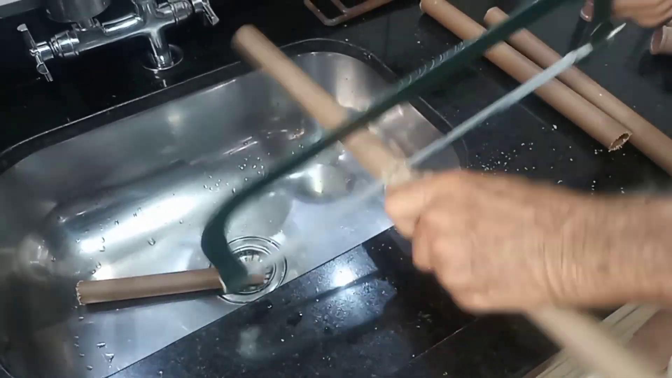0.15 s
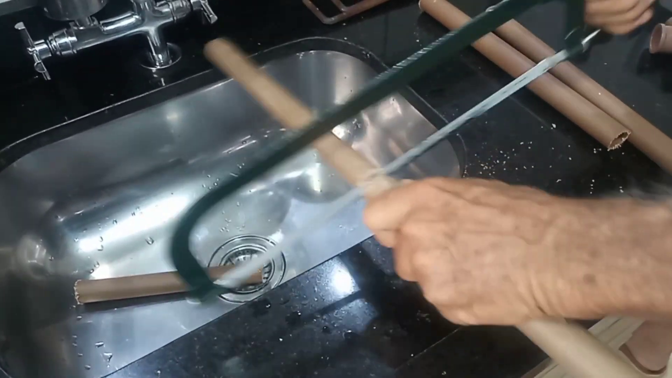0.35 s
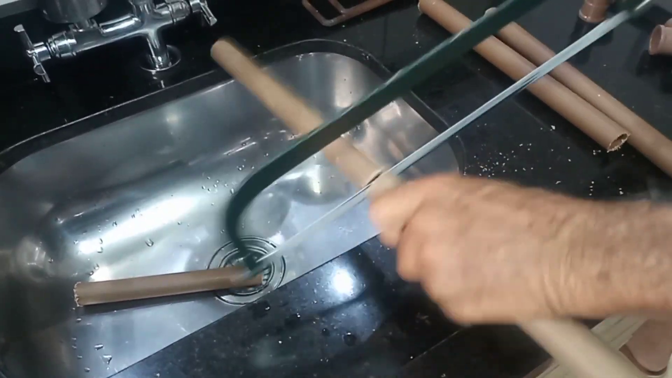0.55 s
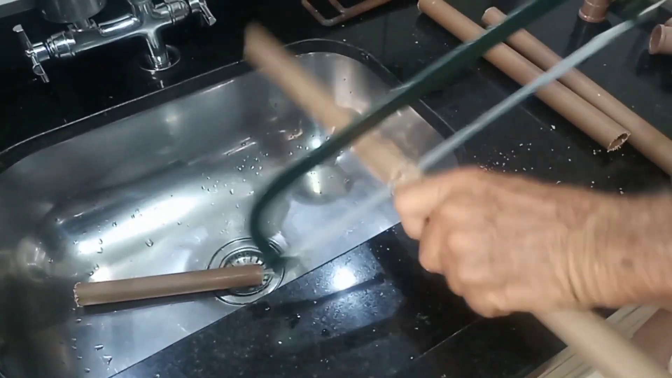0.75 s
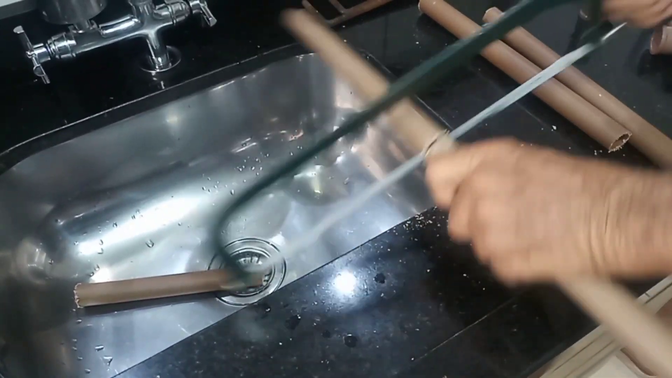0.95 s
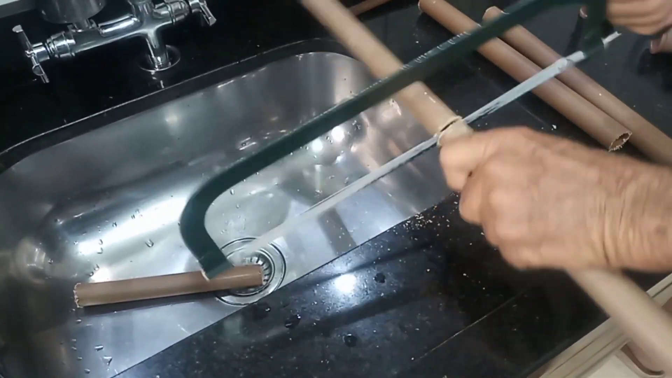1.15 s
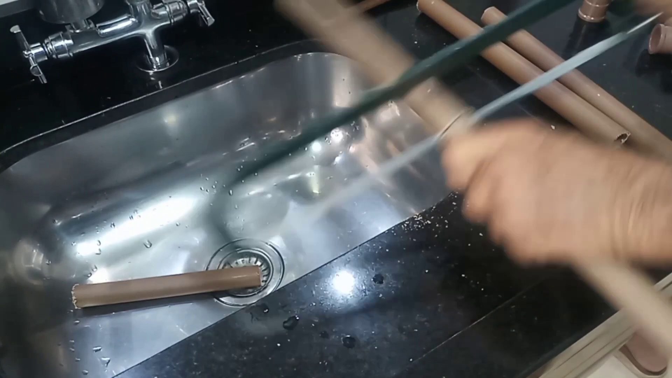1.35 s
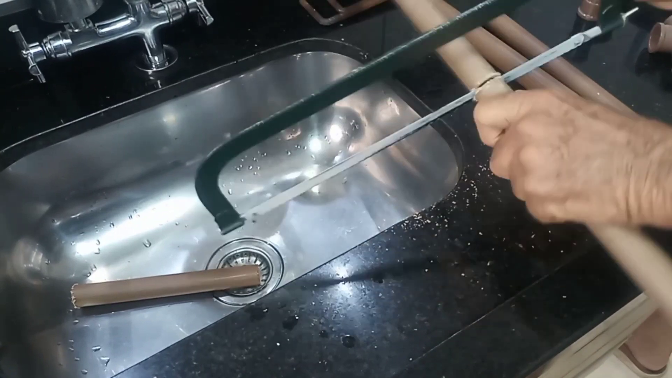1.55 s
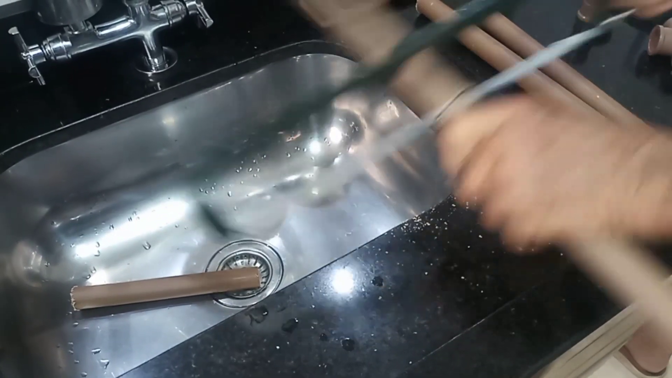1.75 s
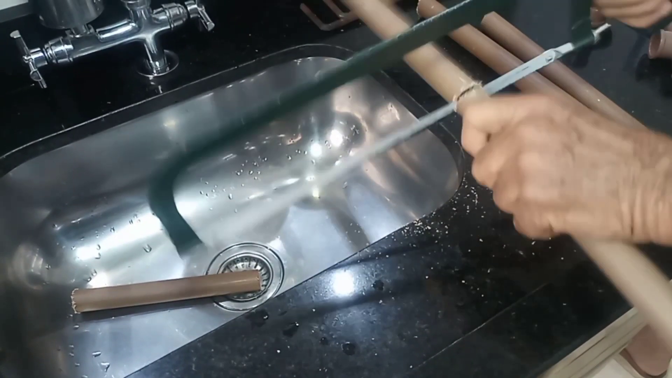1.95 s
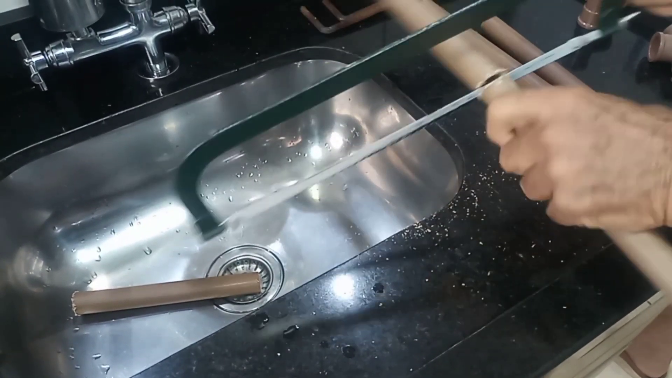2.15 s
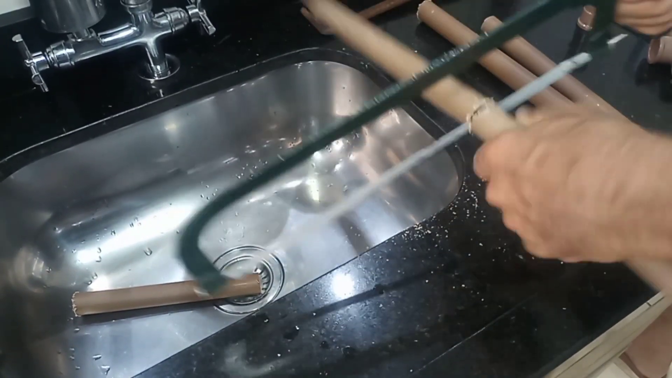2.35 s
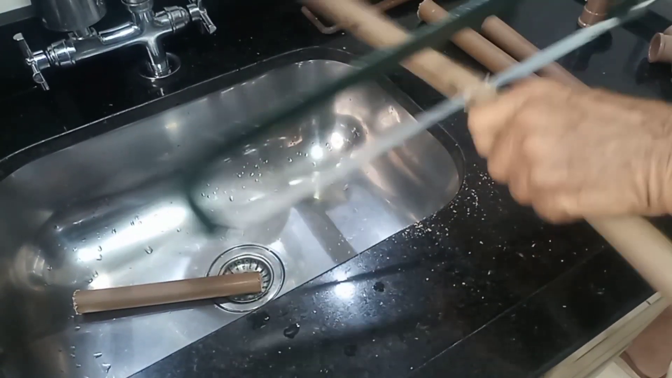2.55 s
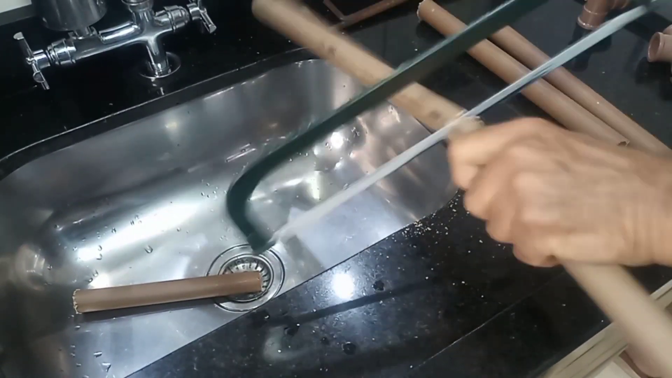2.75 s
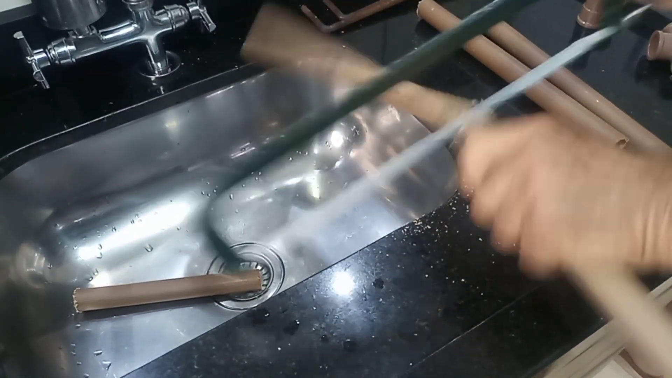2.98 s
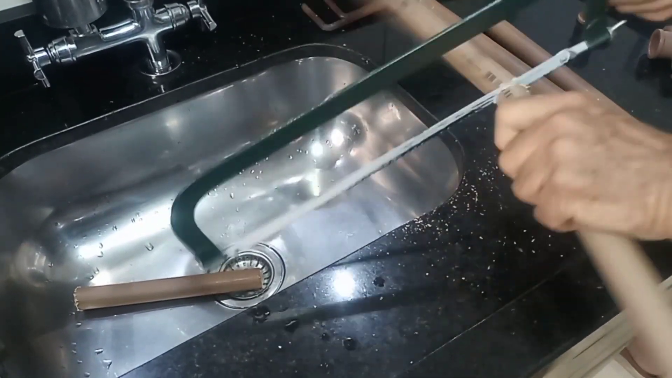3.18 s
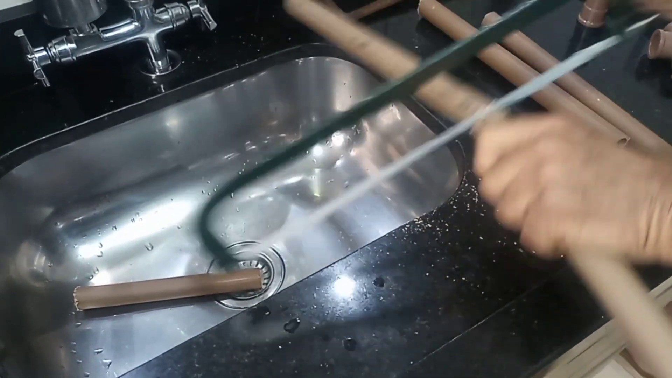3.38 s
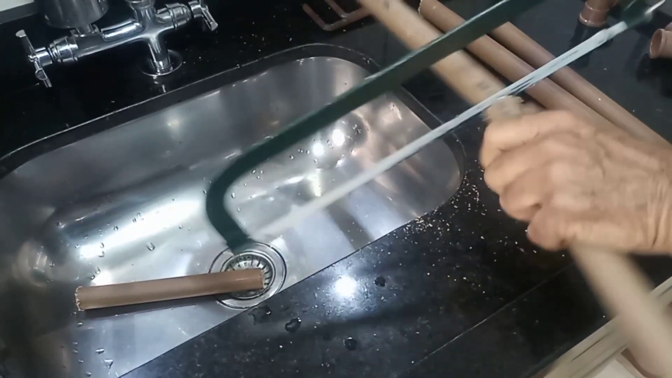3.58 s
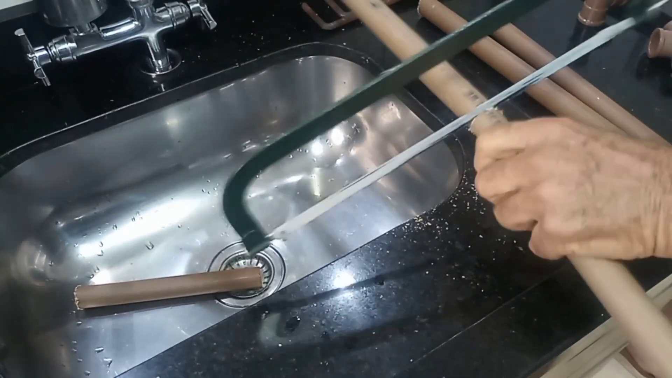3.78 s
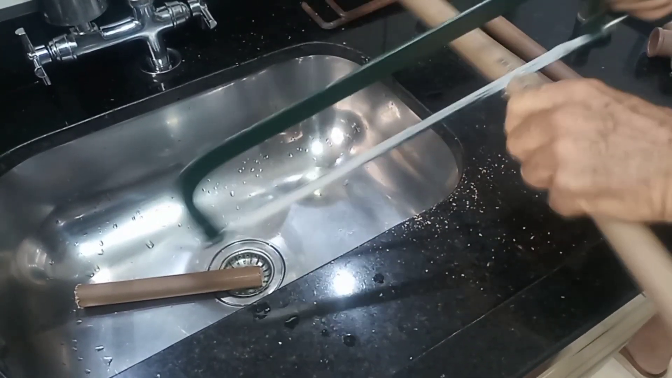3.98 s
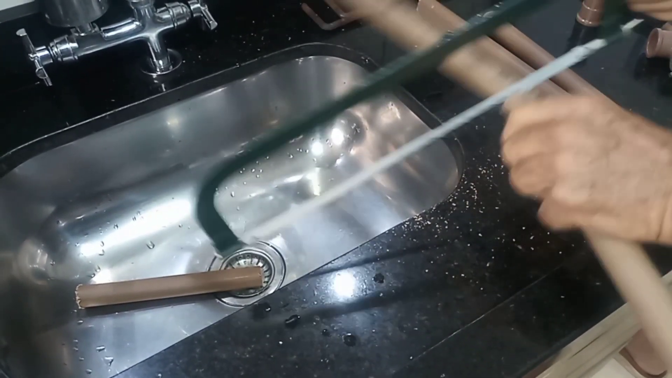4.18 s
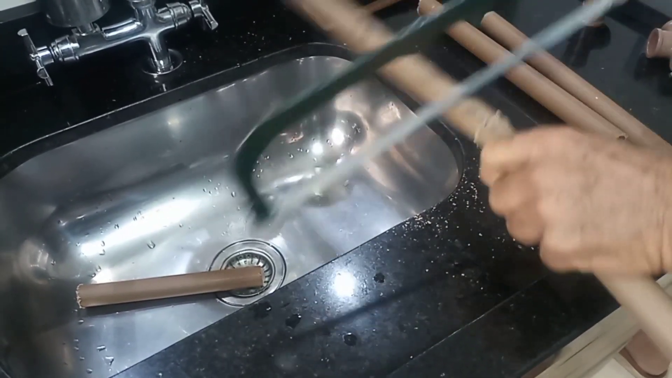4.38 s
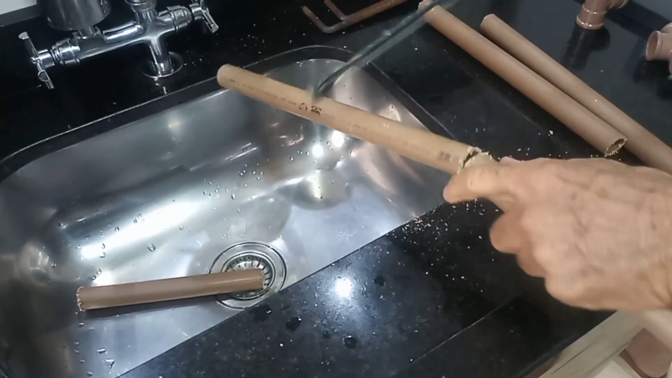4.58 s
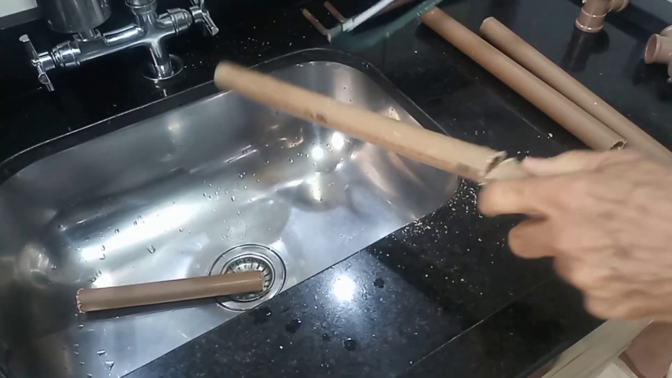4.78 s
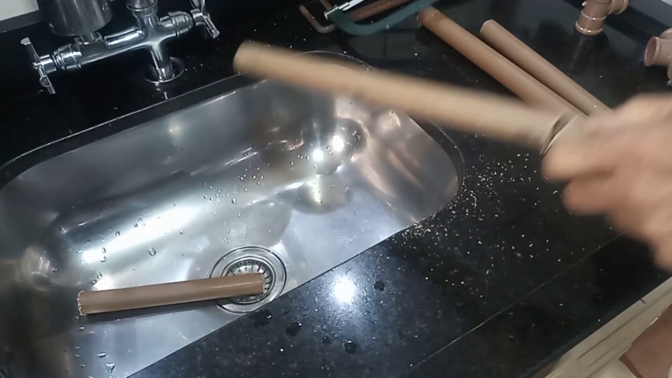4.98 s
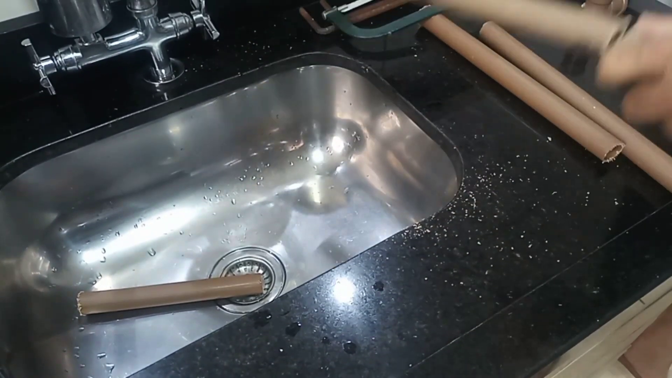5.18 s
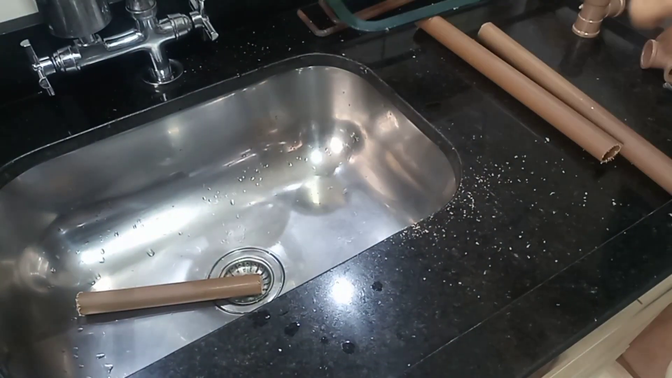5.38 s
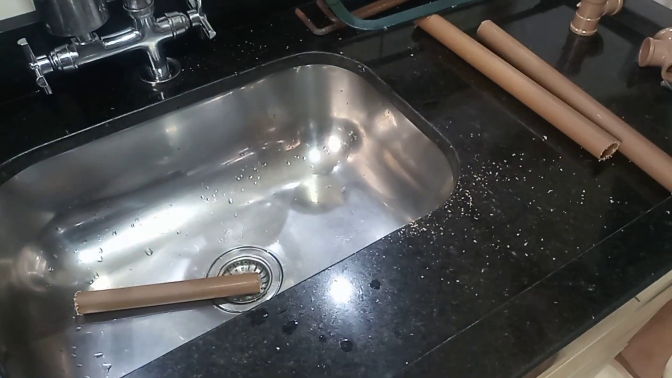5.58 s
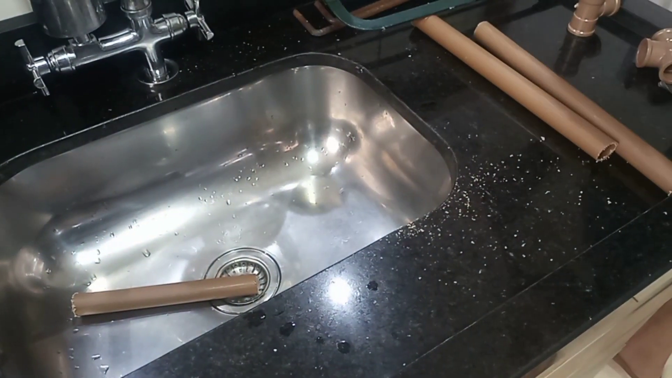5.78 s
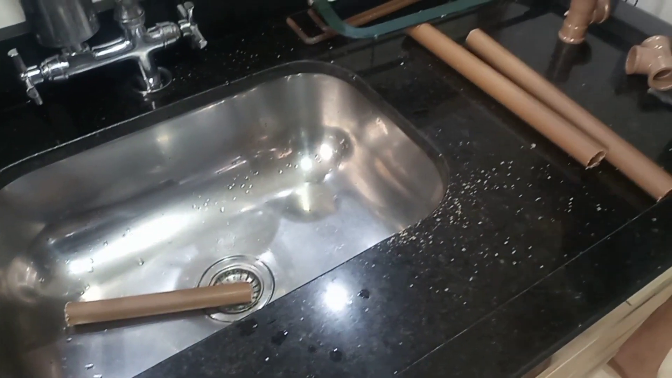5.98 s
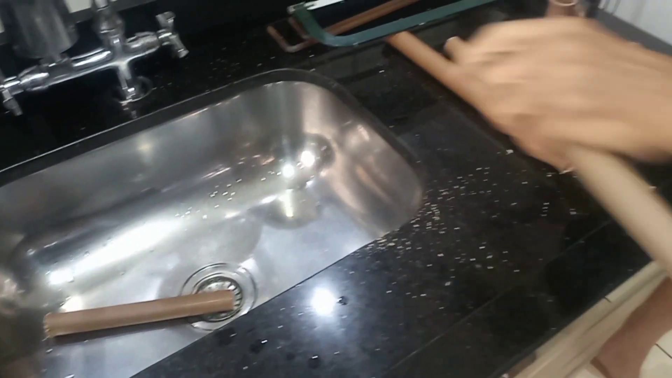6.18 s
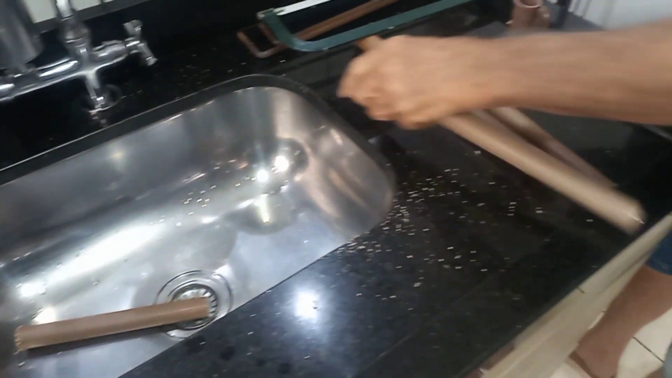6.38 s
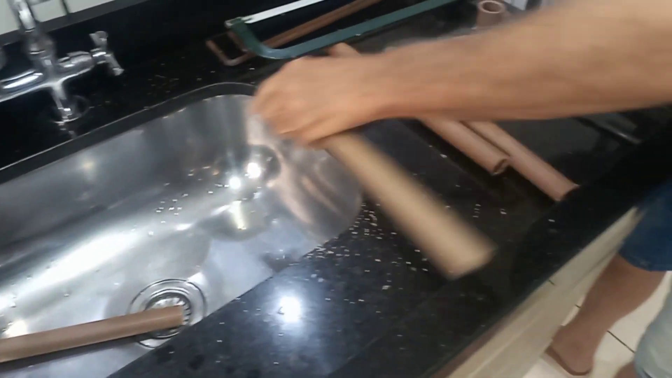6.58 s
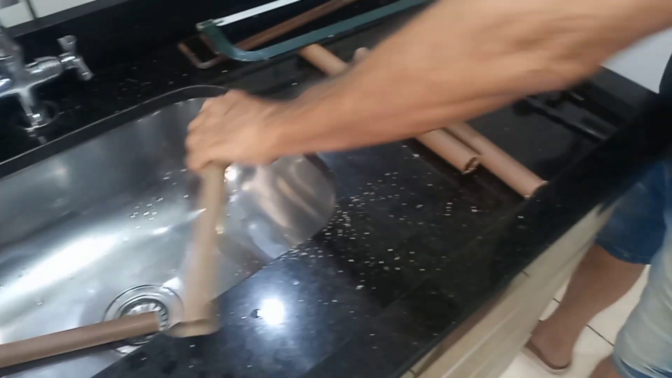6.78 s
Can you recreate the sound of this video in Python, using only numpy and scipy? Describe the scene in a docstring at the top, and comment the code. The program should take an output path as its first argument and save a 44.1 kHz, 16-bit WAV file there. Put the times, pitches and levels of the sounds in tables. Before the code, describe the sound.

In a small reverberant kitchen, a hacksaw cuts plastic pipe close to the microphone. From 0 to 1.6 seconds quick alternating strokes rasp brightly, with hollow pipe bumps and a low boom from the steel sink at the start, a short gap near 0.45 and another bump at 1.2. After a pause, strokes resume at 1.7, fade almost to nothing around 2.1 to 2.45, then run fast and gritty until 4.47, with snags and brief rising zips. The freed blade rings faintly. Slight brushing follows; at 5.0 the saw taps the stone counter. A pipe knocks and judders dully at 5.3, then the saw lands with a loud crack and bright steel rattle from 5.43 to 5.65. Soft pipe knocks and brushing come at 5.9 to 6.2, a clearer woody knock at 6.5, then faint handling over quiet room noise.

```python
"""In a hard-walled kitchen a hacksaw cuts a plastic pipe held by hand over the edge of a steel sink.
Each stroke rasps: the teeth tear off chips as noise bursts, which excite the modes of pipe and blade.
The pipe bumps on the sink; the saw is laid on the stone counter, where it clatters and rings.
Pipes knock, judder and brush on the counter as decaying noise, modal ringing and filtered hiss.
Dense reflections surround all of these, over the steady noise of a quiet room."""
import sys
import numpy as np
from scipy import signal
from scipy.fft import rfft, irfft
from scipy.io import wavfile
from scipy.ndimage import uniform_filter1d

SR = 44100
rng = np.random.default_rng(int(sys.argv[2]) if len(sys.argv) > 2 else 0)


def put_to_file(sound):
    """Save the sound as 16-bit audio at rate SR, in the file named by the first command-line argument."""
    columns = np.atleast_2d(sound).T  # one column per channel
    safe = np.clip(columns, -1, 1)
    whole_steps = np.round(safe * 32767)
    wavfile.write(sys.argv[1], SR, whole_steps.astype(np.int16))


N = 301628
TIME = np.arange(N) / SR


def from_db(db):
    """Logarithmic levels: decibels to amplitude gain."""
    return 10 ** (np.asarray(db) / 20)


def rms_one(x):
    """Normalisation: scale to rms 1."""
    return x / np.sqrt(np.mean(x ** 2) + 1e-20)


def at_hz(points, hz):
    """Interpolation of a table on a log-frequency axis."""
    f, value = np.transpose(points)
    return np.interp(np.log(np.maximum(hz, 1)), np.log(f), value)


def band(x, hz, kind, order=2):
    """Band limiting by a Butterworth filter."""
    sections = signal.butter(order, np.clip(hz, 10, .45 * SR), kind, fs=SR, output="sos")
    return signal.sosfilt(sections, x + 1e-18)


def colour(x, spectrum, size=4096):
    """Minimum-phase (causal) filtering with the given spectral shape and unit power gain."""
    gain = rms_one(from_db(at_hz(spectrum, np.fft.rfftfreq(size, 1 / SR))))
    # folding the cepstrum onto positive times makes the response causal
    cepstrum = irfft(np.log(gain))
    cepstrum[1:size // 2] *= 2
    cepstrum[size // 2 + 1:] = 0
    response = irfft(np.exp(rfft(cepstrum)))
    return signal.oaconvolve(x, response)[:N]


def drift(rate):
    """Random modulation: Gaussian knots, rate per second, joined by lines and scaled to rms 1."""
    knots = rng.standard_normal(N // 8)
    return rms_one(np.interp(TIME * rate, np.arange(len(knots)), knots))


def resonate(x, hz, width):
    """Simple resonance: a two-pole band-pass of bandwidth width/Hz with gain 1 at its peak."""
    r = np.exp(-np.pi * width / SR)
    numerator = np.array([1, 0, -1]) * (1 - r * r) / 2
    return signal.lfilter(numerator, [1, -2 * r * np.cos(2 * np.pi * hz / SR), r * r], x)


def ring(clicks, modes):
    """Modal superposition: a click sets off decaying sinusoids, neighbours in opposite sense."""
    out = np.zeros(N)
    for k, (hz, db, t60) in enumerate(modes):
        r = np.exp(-np.log(1000) / (t60 * SR))
        w = 2 * np.pi * hz / SR
        mode = signal.lfilter([0, np.sin(w)], [1, -2 * r * np.cos(w), r * r], clicks + 1e-18)
        out += (-1) ** k * from_db(db) * mode
    return out


def blows(times, db):
    """Impulsive excitation: one click for each blow."""
    out = np.zeros(N)
    out[np.round(times * SR).astype(int)] = from_db(db)
    return out


def crack(clicks, t60):
    """High modal density: each click starts exponentially decaying noise, its modes unresolved."""
    envelope = signal.lfilter([1], [1, -np.exp(-np.log(1000) / (t60 * SR))], clicks + 1e-18)
    return envelope * rng.standard_normal(N)


def swing(start, end, crest):
    """Half-sine motion of the arm: from rest up to 1 at its crest and back to rest."""
    top = start + np.clip(crest, .05, .95) * (end - start)
    inside = slice(max(int(start * SR), 0), int(end * SR))
    out = np.zeros(N)
    phase = np.interp(TIME[inside], [start, top, end], [0, .5, 1])
    out[inside] = np.abs(np.sin(np.pi * phase))
    return out


def chatter(span, touches_per_s=260, spread_db=3):
    """Random impact train: light touches of uneven strength, denied regularity, under one swing."""
    touches = (rng.random(N) < touches_per_s / SR) * from_db(spread_db * rng.standard_normal(N))
    return touches * swing(*span)


# cutting noise: spectral shape of the rasp (f/Hz, level/dB per Hz, relative); the snags share it
RASP = [(120, -68), (200, -50.5), (305, -32.5), (380, -34.5), (519, -13.5), (683, -5.5), (899, -11),
        (1230, -7), (1770, -12), (3300, 1.5), (4050, 5.5), (4860, -1), (7680, -2.5), (9060, -6.5),
        (13800, -10), (15400, -12.5), (16000, -9.5)]
# band in which the sink shakes (lowest f/Hz, highest f/Hz)
THRUM_HZ = (285, 420)


def sawing(tone_db=-8, tone_hz=1900, tooth_db=1.0, catch_db=1.5, chip_fade=2.0, uneven_db=-0.26,
           thrum_db=-1, shake_db=-30):
    """Stick and release: each tooth catches with a jolt and tears off a chip; both excite resonances."""
    rasp_gain, body_gain, hiss_gain, thrum_gain = bite()
    rate, even, tone, octave = blade_motion()
    passed = np.cumsum(rate) / SR  # teeth passed so far
    tooth = passed.astype(int)
    depth = from_db(tooth_db * rng.standard_normal(N))[tooth]
    clicks = np.diff(tooth, prepend=0) * depth
    jolts = rms_one(band(band(clicks, tone_hz, "low"), 330, "high"))
    chips = rms_one(rng.standard_normal(N) * depth * np.exp(-chip_fade * (passed % 1)))
    unevenness = from_db(catch_db * drift(170) + uneven_db * drift(56))
    force = (chips + from_db(tone_db) * even * jolts) * unevenness
    cut = colour(chip_colour(force + blade_rings(force) + pipe_rings(force)), RASP)
    # a heavy push brings out the body of the pipe, a light pull leaves the hiss
    body = rms_one(band(cut, 1790, "low", order=4))
    rasp = rms_one(band(cut, [1700, 7600], "band", order=4))
    hiss = rms_one(band(cut, 9430, "high", order=4))
    # pressing the pipe down passes the shaking on to the sink
    shaking = rms_one(band(chips, THRUM_HZ, "band", order=4))
    deep_shaking = from_db(shake_db) * rms_one(band(chips, 120, "low"))
    thrum = from_db(thrum_db) * (shaking + deep_shaking)
    strokes = body_gain * body + rasp_gain * rasp + hiss_gain * hiss + thrum_gain * thrum
    return strokes + tooth_tone(passed, tone, octave) + snags()


# saw strokes, pushes and pulls in turn (start t/s, end t/s, crest as share of the length,
# rasp level/dB, pipe body level/dB re rasp, hiss level/dB re rasp, sink thrum level/dB before its trim)
STROKES = [(0, 0.081, 0.033, -33, -3, 1, -44.5), (0.062, 0.206, 0.075, -25, -3, -6.5, -51),
           (0.184, 0.318, 0.28, -30, -5, -1, -42.5), (.35, 0.444, .12, -42.5, 1.5, -8, -48),
           (0.501, 0.596, 0.32, -24.5, -14.5, -4.5, -73), (0.661, 0.796, 0.42, -21.5, -13.5, -2.5, -71.5),
           (0.781, 0.915, 0.77, -27, -14, -3, -75), (0.917, 1.08, 0.34, -24.5, -12, -2, -83),
           (1.054, 1.162, 0.49, -29, -9, 3.5, -71.5), (1.192, 1.329, 0.29, -24, -7, 1, -45),
           (1.305, 1.44, .45, -28, -11, -1, -65.5), (1.441, 1.59, .34, -24, -10, 0, -88.5),
           (1.724, 1.833, 0.44, -27, -21, 2.5, -65), (1.825, 1.963, 0.39, -25.5, -11, -2, -73),
           (1.952, 2.125, 0.29, -27.5, -11.5, 2, -71.5), (2.116, 2.309, 0.66, -66.5, -34, 14.5, -97),
           (2.318, 2.509, 0.72, -61, -34, 14.5, -95), (2.466, 2.576, 0.76, -33.5, -15.5, 0.5, -84),
           (2.587, 2.668, 0.22, -33, -4.5, -2.5, -45.5), (2.697, 2.795, 0.41, -23, -7.5, -4, -59.5),
           (2.808, 2.925, 0.24, -23, -14.5, -2, -59), (2.935, 3.01, 0.51, -25, -6, -4, -49.5),
           (3.009, 3.082, 0.12, -25, -12, -3, -50.5), (3.098, 3.216, .12, -27, -13, 1, -55),
           (3.203, 3.336, 0.25, -22.5, -7.5, 0.5, -57.5), (3.322, 3.488, 0.28, -27.5, -9, -1, -72),
           (3.474, 3.595, .36, -24, -9.5, 0.5, -70), (3.607, 3.734, 0.38, -30, -12.5, -2, -61),
           (3.737, 3.805, 0.48, -30, -3, -2, -53), (3.834, 3.944, .45, -23.5, -11.5, -1, -55),
           (3.954, 4.078, 0.42, -24.5, -3.5, -1.5, -66), (4.112, 4.248, 0.15, -26, -10.5, -1.5, -70),
           (4.266, 4.358, 0.46, -23, -10.5, -4.5, -74), (4.413, 4.47, 0.34, -31.5, -11, 1, -81)]
BITE_POWER = 0.95  # the cut grows louder as this power of the arm's swing


def bite():
    """Energy addition of strokes that follow the arm: gains of rasp, pipe body, hiss and sink thrum."""
    power = np.zeros((4, N))
    for start, end, crest, rasp_db, body_db, hiss_db, thrum_db in STROKES:
        effort = swing(start, end, crest)
        inside = effort > 0
        gains = from_db([rasp_db, rasp_db + body_db, rasp_db + hiss_db, thrum_db])
        power[:, inside] += np.outer(gains, effort[inside] ** BITE_POWER) ** 2
    return np.sqrt(power)


# runs in which the teeth bite evenly and sing a gliding zip (start t/s, end t/s,
# tooth rate f/Hz at the start, middle and end, tone level/dB, octave level/dB)
ZIPS = [(.066, 0.171, 541.7, 734, 806, -45, -35), (0.674, .735, 560.8, 808, 1232, -42, -47),
        (1.459, 1.517, 715, 1148, 1390, -31, -50), (1.747, 1.815, 589.7, 702.3, 738, -29.5, -35.5),
        (1.988, 2.082, 553.3, 778.7, 836, -31.5, -61), (2.7, 2.746, 497.6, 619.3, 698, -25.5, -31.5),
        (2.955, 3.023, 614, 766, 972, -29.5, -51), (3.026, 3.089, 565, 523.8, 496, -33, -39.5),
        (3.213, 3.253, 507.7, 656, 789.7, -28.5, -38), (3.243, 3.315, 1166, 1235, 1232, -31, -41.5),
        (3.486, 3.59, 615.4, 780, 828, -30, -33.5), (4.279, 4.35, 628, 681.7, 722, -27, -23)]
TOOTH_JITTER = .05  # rms unevenness from tooth to tooth, as share of the rate


def blade_motion(turn_hz=490, top_hz=1050, arch=.8, speed_crest=.6, zip_crest=.33):
    """Kinematics: blade speed sets the teeth per second; also evenness, gains of tone and octave."""
    pace = np.max([swing(start, end, speed_crest) for start, end, *_ in STROKES], axis=0)
    rate = turn_hz + (top_hz - turn_hz) * pace ** arch
    even, tone, octave = np.zeros((3, N))
    for start, end, first, middle, last, tone_db, octave_db in ZIPS:
        run = swing(start, end, zip_crest)
        inside = run > even
        glide = np.polyfit([0, .5, 1], [first, middle, last], 2)
        rate[inside] = np.polyval(glide, (TIME[inside] - start) / (end - start))
        gains = from_db([0, tone_db, octave_db])
        even[inside], tone[inside], octave[inside] = np.outer(gains, run[inside])
    return rate * (1 + TOOTH_JITTER * drift(300)), even, tone, octave


def blade_rings(force, width_hz=60, ring_db=-4, swing_db=7, count=44):
    """Moving excitation: the sliding contact keeps waking other narrow modes of the blade."""
    pitches = np.geomspace(900, 15000, count) * rng.uniform(.96, 1.04, count)
    out = np.zeros(N)
    for hz in pitches:
        gain = from_db(ring_db + swing_db * np.minimum(drift(14), 2))
        out += resonate(force * gain, hz, width_hz)
    return out


# resonances of pipe and blade under the teeth (f/Hz, bandwidth/Hz, level/dB before the common share)
CUT_MODES = [(527, 12, 0.5), (779, 33, -8), (1230, 72, -12.5), (1585, 130, -15), (2033, 22, -0.5),
             (2230, 53, 2), (2513, 30, -1.5), (7720, 330, 3)]
CUT_SHIFT = .045  # share by which the resonances shift with the place of contact


def pipe_rings(force, share_db=-5, swing_db=4, swings_per_s=11):
    """Position-dependent resonance: the sliding contact favours now one shifted mode, now another."""
    out = np.zeros(N)
    for hz, width, db in CUT_MODES:
        for step in (-1, 0, 1):
            gain = from_db(db + share_db + swing_db * np.minimum(drift(swings_per_s), 1.5))
            out += resonate(force * gain, hz * (1 + CUT_SHIFT * step), width)
    return out


def chip_colour(x, count=22, patchy_db=3.0, bites_per_s=120):
    """Band-wise modulation: chips differ in size, so each band swells and sinks on its own."""
    edges = np.geomspace(1500, 15000, count)
    parts = [band(x, edges[0], "low", order=4)]
    parts += [band(x, [lo, hi], "band") for lo, hi in zip(edges, edges[1:])]
    parts += [band(x, edges[-1], "high", order=4)]
    out = np.zeros(N)
    for k, part in enumerate(parts):
        out += (-1) ** k * part * from_db(patchy_db * np.minimum(drift(bites_per_s), 2))
    return out


TOOTH_FLUTTER_DB = 4.5  # unevenness of the tone's level


def tooth_tone(passed, tone, octave):
    """Periodic forcing: the pipe wall rocks once for every tooth that passes, with an octave above."""
    out = np.zeros(N)
    for k, gain in ((1, tone), (2, octave)):
        flutter = from_db(TOOTH_FLUTTER_DB * np.minimum(drift(200), 1.5))
        out += gain * flutter * np.sin(2 * np.pi * k * passed)
    return out


# a tooth snags and breaks free (t/s, peak level/dB before the common offset)
SNAGS = [(0.013, -5), (0.075, 2.5), (0.204, 3.5), (0.406, -11), (.519, -6), (0.68, -7.5), (1.474, -0.5),
         (2.321, -27), (2.546, 0), (2.602, -9), (2.713, 7.5), (2.866, 2.5), (2.9, 6.5), (2.966, 3),
         (3.109, -12.5), (3.17, 3), (3.221, 7.5), (3.412, 5.5), (3.491, -3), (3.681, -4), (3.758, 1.5),
         (3.853, -4.5), (4.12, -8.5), (4.195, -5.5), (4.428, -16), (4.47, -0.5)]


def snags(offset_db=-16.0, t60=0.043):
    """Sudden release: each snagged tooth breaks free with a short burst of rasp."""
    s, peak_db = np.transpose(SNAGS)
    return colour(crack(blows(s, peak_db + offset_db), t60), RASP)


# modes of the pipe, struck as the blade leaves the cut (f/Hz, level/dB, t60/s)
RELEASE_MODES = [(1534, -43, .22), (1820, -40, .2), (2210, -43, .17), (2476, -42, .28), (3655, -46, .25)]
RELEASE_AT = 4.469  # s


def pipe_release():
    """Free vibration: the blade leaves the cut and the pipe rings on."""
    return band(ring(blows(RELEASE_AT, 0), RELEASE_MODES), 1000, "high")


# the pipe bumps on the sink (t/s, then level/dB before offsets: clack, boom, hollow note, dull thump)
BUMPS = [(.013, 13, -37.5, -30.5, -50.5), (.078, 15.5, -27, -26.5, -33.5), (.113, -9, -41, -20.5, -31.5),
         (.15, -12, -46.5, -25, -41), (.353, 0.5, -58, -30, -51), (.364, 2.5, -71, -29.5, -33.5),
         (1.198, 7, -58, -27, -27), (2.556, 1.5, -62, -32.5, -30.5)]
# modes of the steel basin (f/Hz, level/dB, t60/s)
SINK_MODES = [(203, 2, .33), (272, 1, .3), (310, -3, .22), (368, -5, .22), (440, -14, .2)]
# the pipe's hollow note when it bumps (f/Hz, level/dB, t60/s)
PIPE_MODES = [(702, -16, .09), (734, 1, 0.14), (1270, -3, 0.066), (1420, -7.5, 0.23)]
# spectral shape of a plastic clack, on sink or counter (f/Hz, level/dB per Hz, relative)
KNOCK_COLOUR = [(88, -55.5), (150, -14.5), (368, -16.5), (475, -7), (941, 0.5), (1870, -6.5), (2310, 3),
                (2760, -3.5), (3700, 6.5), (4580, 4), (7800, -4), (9080, -6.5), (11000, 0.5), (15000, -15),
                (16000, -21.5)]


def bumps(clack_db=-17, boom_db=-5, note_db=2, clack_t60=0.014, thump_t60=0.073, low_hz=310, high_hz=760):
    """Impact of pipe on rim: returns clack and thump with the basin's boom, and the hollow note."""
    s, peak, boom, note, thump_db = np.transpose(BUMPS)
    clack = colour(crack(blows(s, peak + clack_db), clack_t60), KNOCK_COLOUR)
    basin = band(ring(blows(s, boom + boom_db), SINK_MODES), 100, "high", order=4)
    thump = band(crack(blows(s, thump_db), thump_t60), [low_hz, high_hz], "band", order=4)
    thump = thump * np.sqrt(SR / 2 / (high_hz - low_hz))  # makes up the power lost outside the band
    hollow_note = band(ring(blows(s, note + note_db), PIPE_MODES), 560, "high")
    return band(clack, 220, "high") + thump + basin, hollow_note


# the saw drops on the stone, rocks and settles (t/s, clack level/dB, ring level/dB,
# contact: tip 0, side 1, heel 2)
SAW_HITS = [(4.967, 1, -11, 0), (5.031, -22, -29, 1), (5.085, -4.5, -23, 0.75), (5.428, 9, 0, 2.5),
            (5.467, -7.5, -17, 1.1), (5.496, -6, -4.5, 0.65), (5.522, -6, -7, 1.45), (5.561, -14, -7, 2),
            (5.581, -11, -11.5, 1.7), (5.648, -17, -32, 0.24)]
# spectral shape of the saw's clack (f/Hz, level/dB per Hz, relative)
SAW_CLACK = [(88, -42.5), (150, -41.5), (368, -10), (900, -12), (1350, -5), (1800, -18.5), (2220, -6),
             (3000, -10.5), (3700, -7.5), (4490, -7), (5150, -10), (5680, -5.5), (6260, -12.5), (6770, -6),
             (8000, -6), (8900, -19), (11200, -15), (13000, -14), (15300, -18), (16000, -22)]
# modes of the steel saw (f/Hz, level/dB struck on the tip, on the side, on the heel, t60/s)
SAW_MODES = [(2180, -24, -22, -20, .45), (2770, -24, -19, -22, .35), (3560, -11, -24, -22, .2),
             (3680, -22, -13, -14, .26), (3822, -17, -15, -22, .3), (4490, -17, -9, -8, .3),
             (4620, -14, -11, -14, .3), (5535, -14, 0, -7, .37), (5701, -20, -7, -15, .37),
             (5755, -7, -22, -22, .35), (6590, -9, -20, -20, .25), (6697, -15, -8, -12, .3),
             (6870, -18, -9, -12, .3), (6900, -12, -6, -14, .35), (7687, -5, -11, -18, .3),
             (7760, -22, -10, -12, .3), (7908, -18, -15, -4, .25), (8030, -18, -20, -5, .2),
             (8213, -13, -7, -14, .32), (8560, -11, -17, -22, .25), (9028, 0, -13, -16, .22),
             (9449, -20, -1, -12, .34), (9690, -5, -24, -24, .27), (9819, -22, -14, -16, .33),
             (9970, -2, -24, -22, .27), (10447, -22, -17, -10, .28), (10540, -11, -24, -24, .22),
             (10708, -22, -16, -14, .3), (11036, -9, -19, -20, .27), (11175, -22, -17, -7, .22),
             (11422, -9, -20, -20, .27), (11690, -24, -17, -15, .27), (12140, -22, -16, -6, .25),
             (12320, 4, -22, -18, .19), (12733, -20, -12, -3, .24), (12880, -13, -16, -14, .22),
             (12986, -22, -11, -9, .24), (13728, 3, -15, -20, .27), (13968, -22, -16, -11, .23),
             (14480, -14, -19, -18, .3), (14550, -23, -22, -22, .6), (15324, 1, -14, -15, .26),
             (15478, -20, -13, -11, .24)]
# its blade chatters as it settles (start t/s, end t/s, crest as share of the length)
RATTLE = (5.45, 5.665, 0.2)
# modes of the counter, under saw and pipes (f/Hz, level/dB, t60/s)
COUNTER_MODES = [(192, -12.5, 0.21), (234, -6.5, 0.069), (288, -8, 0.095), (330, -3.5, 0.56),
                 (316, -14, 0.19), (367.7, 4.5, 0.19), (473, 6, 0.093), (542, 2.5, 0.22), (654, -3, 0.21),
                 (800, -17, 0.077)]
BUZZ_DB, BUZZES_PER_S = 2.0, 130  # the loose blade buzzes, so each mode flutters on its own


def saw_drop(clack_t60=0.053, thud_db=-47, steel_db=1, chatter_clack_db=-19, chatter_ring_db=-25,
             tick_db=-6, tick_t60=0.023):
    """Modal excitation by place of impact, steel on stone: returns the clatter and the ringing."""
    s, clack_db, ring_db, contact = np.transpose(SAW_HITS)
    touches, steel = chatter(RATTLE), np.zeros(N)
    for k, (hz, *levels_db, t60) in enumerate(SAW_MODES):
        gains = from_db(levels_db)
        contact_gain = np.interp(contact, [0, 1, 2], gains)
        hits = blows(s, ring_db + 20 * np.log10(contact_gain))
        # the chatter strikes between side and heel
        light = from_db(chatter_ring_db) * gains[1:].mean() * touches * rng.standard_normal(N)
        buzz = from_db(BUZZ_DB * np.minimum(drift(BUZZES_PER_S), 1))
        steel += (-1) ** k * ring(hits + light, [(hz, 0, t60)]) * buzz
    thud = band(ring(blows(s, clack_db + thud_db), COUNTER_MODES), 260, "high", order=4)
    clacks = blows(s, clack_db) + from_db(chatter_clack_db) * touches
    clatter = colour(crack(clacks, clack_t60), SAW_CLACK)
    tick = band(crack(blows(s, clack_db + tick_db), tick_t60), 3000, "high")
    # thin steel radiates no bass
    ringing = from_db(steel_db) * band(steel, 2100, "high", order=4)
    return band(clatter, 130, "high") + tick + thud, ringing


# dull resonances of the saw's grip (f/Hz, bandwidth/Hz, level/dB)
GRIP_MODES = [(1780, 300, 7), (2250, 300, 7), (3600, 260, 0)]
GRIP_AT, GRIP_DB = 5.429, 17  # s, dB before the filters


def grip(crack_t60=0.055, lowest_hz=1200):
    """Damped resonance: the plastic grip lands with the saw and cracks on the stone."""
    burst = band(crack(blows(GRIP_AT, GRIP_DB), crack_t60), lowest_hz, "high")
    return sum(from_db(db) * resonate(burst, hz, width) for hz, width, db in GRIP_MODES)


# pipes knock on the counter; the contact sets the band that is struck
# (t/s, clack level/dB, ring level/dB, thud level/dB, lowest f/Hz, highest f/Hz)
KNOCKS = [(5.271, -3.5, -44, -52, 1100, 15000), (5.296, -22, -37, -48, 302, 2540),
          (5.912, -13, -34, -57, 365, 900), (5.934, -15, -34.5, -46, 318, 1530),
          (5.945, -25, -53, -50, 900, 3100), (6.056, -25.5, -65, -57, 1510, 9000),
          (6.076, -31.5, -41, -51, 395, 934), (6.107, -32, -38.5, -59, 276, 527),
          (6.518, -12.5, -36.5, -44.5, 510, 12820), (6.534, -13, -29.5, -53, 544, 1190),
          (6.809, -44, -82, -87, 1990, 6100)]
# woody modes of the pipe (f/Hz, level/dB, t60/s)
KNOCK_MODES = [(374.4, -3.5, 0.33), (533, -8, 0.24), (720, -5, .1), (846, -8.5, 0.11), (977, -5.5, 0.081),
               (1138, -7, 0.16), (1340, -7.5, 0.17), (1455, -2.5, 0.17), (2260, 8.5, .15),
               (2282, 3.5, 0.15), (3750, -17, .1), (4370, -11.5, .1), (4856, 3.5, 0.14), (5900, -22.5, .12)]


def knocks(clack_t60=0.023):
    """Band-limited impact, plastic on stone: returns clack with counter thud, and the woody ring."""
    clacks, pushes = np.zeros((2, N))
    for s, clack_db, ring_db, _, low_hz, high_hz in KNOCKS:
        at, struck = np.array(s), [low_hz, high_hz]
        pushes += band(blows(at, ring_db), struck, "band", order=3)
        clacks += band(crack(blows(at, clack_db), clack_t60), struck, "band", order=3)
    s, _, _, thud_db, _, _ = np.transpose(KNOCKS)
    thud = band(ring(blows(s, thud_db), COUNTER_MODES), 250, "high", order=4)
    return colour(clacks, KNOCK_COLOUR) + thud, ring(pushes, KNOCK_MODES)


# the pipe, put down, judders on the counter (start t/s, end t/s, crest as share of the length)
JUDDER = (5.278, 5.406, 0.14)
# its spectral shape (f/Hz, level/dB per Hz, relative)
JUDDER_COLOUR = [(70, -36.5), (140, -14.5), (220, -1), (340, 8.5), (560, 2), (800, -1), (1300, -1.5),
                 (2400, 3.5), (3600, 0), (6000, -16), (15000, -22)]


def judder(level_db=-27, touch_t60=0.0074, touches_per_s=400, spread_db=3):
    """Repeated impact: the pipe bounces in a quick, dull rattle before it lies still."""
    touches = from_db(level_db) * chatter(JUDDER, touches_per_s, spread_db)
    return colour(crack(touches, touch_t60), JUDDER_COLOUR)


# hand and pipe brush over the counter (start t/s, end t/s, level/dB)
BRUSHES = [(4.75, 4.765, -48.5), (4.877, 4.945, -53), (5.8, 5.92, -48), (5.907, 5.95, -39.5),
           (6.003, 6.048, -43.5), (6.044, 6.107, -39.5), (6.11, 6.224, -48), (6.243, 6.363, -58.5),
           (6.344, 6.522, -57.5), (6.68, 6.795, -62.5), (6.805, 6.846, -52)]


def handling(grain_db=4.0, crest=0.21):
    """Friction noise: skin and plastic brush over the counter; each brush swells and fades."""
    level = sum(from_db(db) * swing(start, end, crest) for start, end, db in BRUSHES)
    grains = rng.standard_normal(N) * from_db(grain_db * drift(200))
    return level * rms_one(band(grains, [5800, 13000], "band"))


# reverberation time of the kitchen (f/Hz, t60/s)
ROOM_T60 = [(150, 0.48), (500, 0.37), (2000, 0.32), (8000, 0.28), (16000, 0.21)]


def kitchen(x, wet_db, gap_s=0.0011, size=32768):
    """Diffuse reverberation: dense reflections from tile and stone die faster in the treble."""
    t, white = TIME[:size], rng.standard_normal(size)
    edges = np.geomspace(80, 19000, 9)
    tail = np.zeros(size)
    for lo, hi in zip(edges, edges[1:]):
        t60 = at_hz(ROOM_T60, np.sqrt(lo * hi))
        tail += band(white, [lo, hi], "band") * np.exp(-np.log(1000) * t / t60)
    tail = tail * (t > gap_s)
    wet = from_db(wet_db)
    reflections = signal.oaconvolve(x, tail / np.linalg.norm(tail))[:N]
    return (x + wet * reflections) / np.sqrt(1 + wet ** 2)


# spectral shape of the quiet room (f/Hz, level/dB per Hz, relative)
FLOOR = [(12, -42), (20, -4), (96, -15.5), (310, -4), (1120, -13.5), (4300, -13.5), (4940, -11), (7520, -3),
         (8890, -11), (13500, -7.5), (16000, -13.5)]
FLOOR_DB = -64.5


def room_floor():
    """Stationary background noise: white noise shaped to the quiet room's spectrum."""
    return from_db(FLOOR_DB) * colour(rng.standard_normal(N), FLOOR)


def scene():
    """Direct-to-reverberant balance: sawing close by, the counter a little farther off, a quiet room."""
    clatter, steel = saw_drop()
    thumps, hollow_note = bumps()
    clacks, woody_ring = knocks()
    near = kitchen(sawing() + pipe_release() + handling(), wet_db=-4.0)
    ringing = kitchen(steel + hollow_note + woody_ring, wet_db=-11.0)
    far = kitchen(thumps + clacks + judder() + clatter + grip(), wet_db=-0.5)
    return (near + ringing + far + room_floor())[None]


def gain_control(x, limit_db=-17, release_db_per_s=260, size=220):
    """Dynamic compression: loud blows are held down; the gain recovers as they die away."""
    level = 10 * np.log10(np.maximum(uniform_filter1d(x ** 2, size=size), 1e-12))
    recovery = release_db_per_s * TIME
    excess = np.maximum(level - limit_db, 0)
    # the reduction follows each peak, then falls at the release rate
    reduction = np.maximum.accumulate(excess + recovery, axis=-1) - recovery
    smooth = uniform_filter1d(uniform_filter1d(reduction, size=size // 3), size=size // 3)
    return x * from_db(-smooth)


CUTOFF_HZ = 15750


def record(dry):
    """Band limitation: gain control, then a steep elliptic cut of the top."""
    low_pass = signal.ellip(12, .2, 80, CUTOFF_HZ, fs=SR, output="sos")
    return signal.sosfilt(low_pass, gain_control(dry))


dry = scene()
out = record(dry)
put_to_file(out)
```